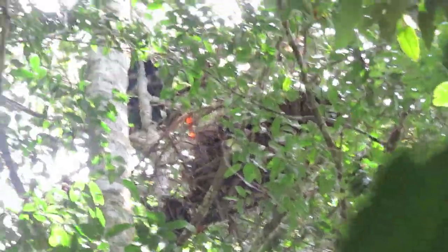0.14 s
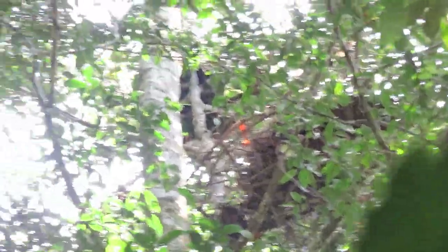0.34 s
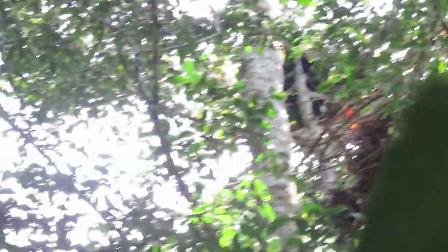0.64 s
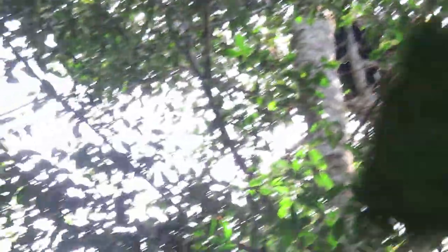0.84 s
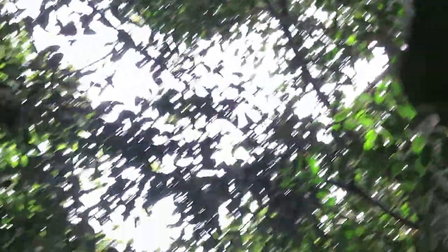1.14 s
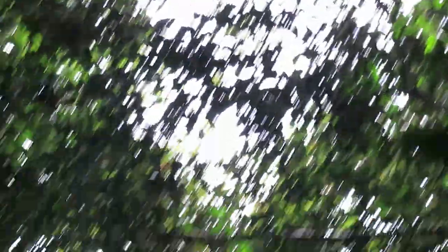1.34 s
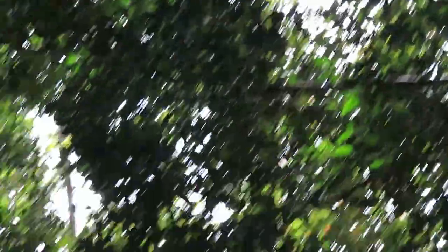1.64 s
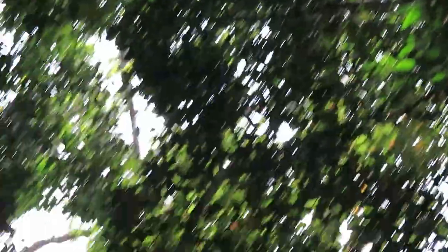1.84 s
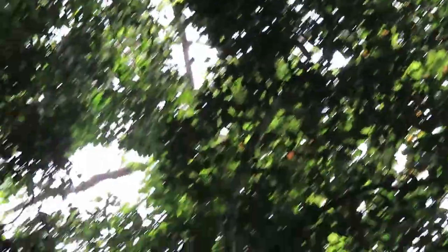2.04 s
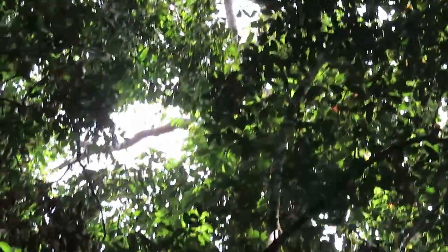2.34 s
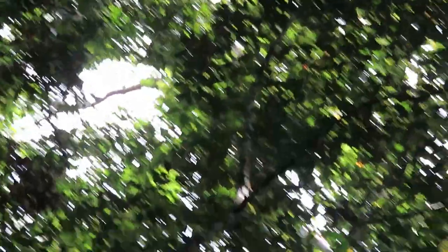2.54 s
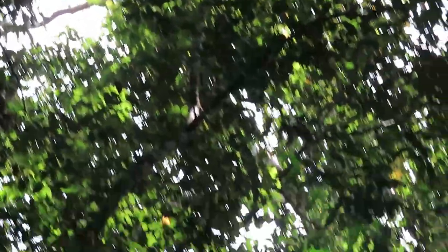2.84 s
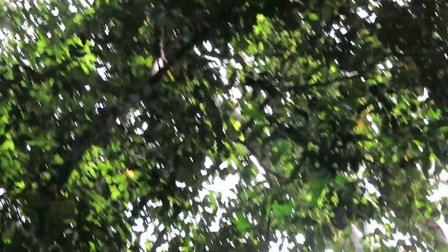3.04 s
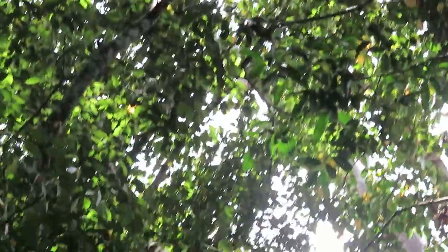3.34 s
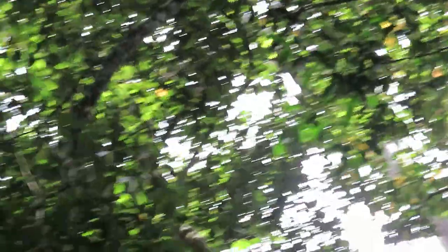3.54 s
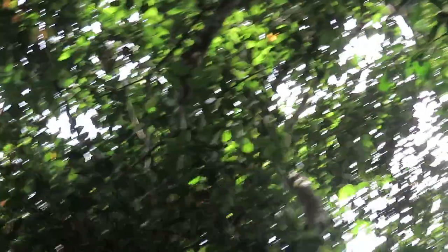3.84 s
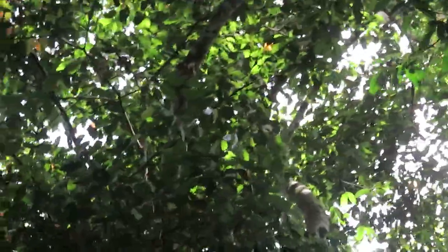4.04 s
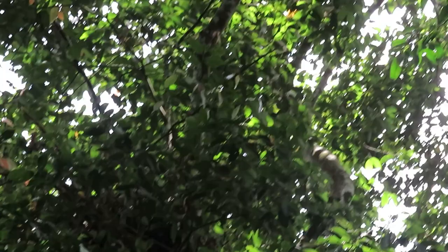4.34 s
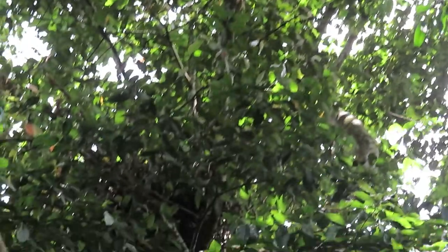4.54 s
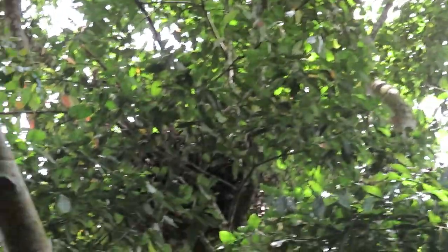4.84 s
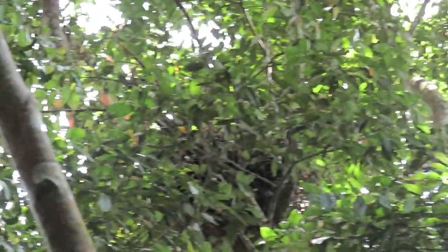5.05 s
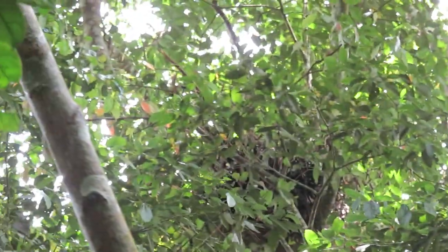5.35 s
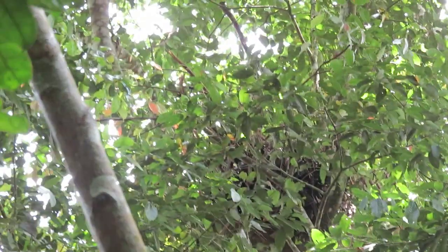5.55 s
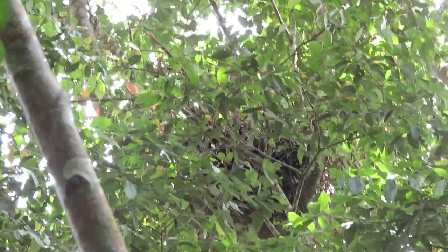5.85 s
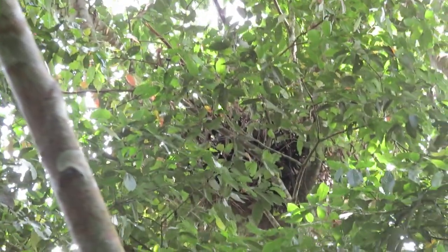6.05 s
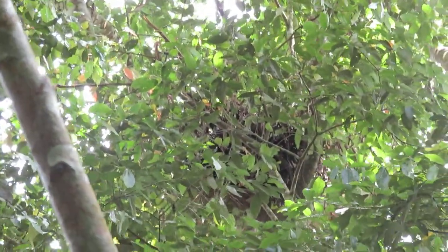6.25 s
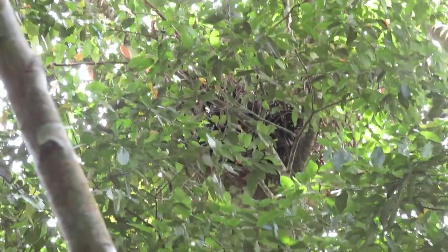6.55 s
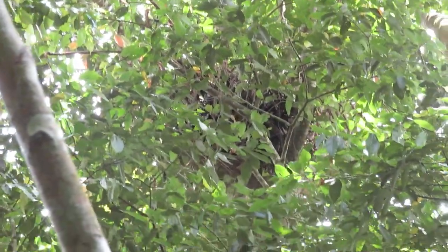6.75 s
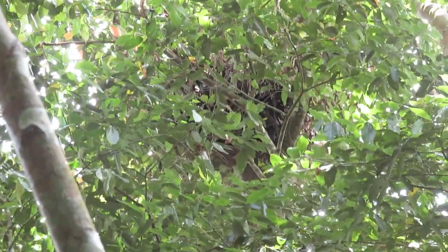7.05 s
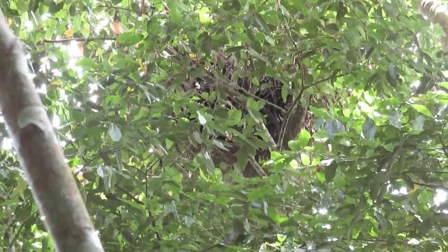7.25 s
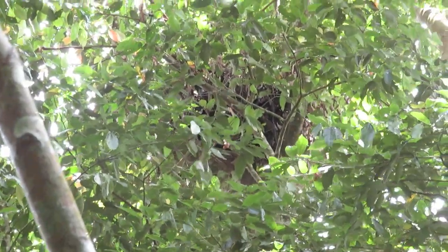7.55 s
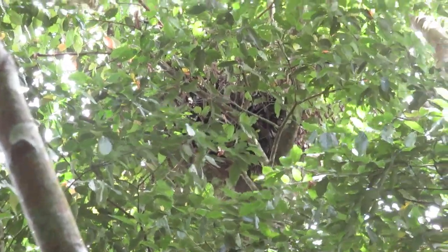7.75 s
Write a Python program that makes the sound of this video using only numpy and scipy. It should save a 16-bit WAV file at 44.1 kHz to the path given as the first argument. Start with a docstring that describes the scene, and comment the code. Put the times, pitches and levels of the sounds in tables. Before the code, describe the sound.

Dry, sharp cracks like twigs breaking come at irregular intervals, very close, each ringing briefly as if inside the camera's shell. Much quieter are the hand-held camera's own noises: stuttering focus rasps near the start and end, dull finger bumps, and a thin zoom whine midway that later gives way to a lower hum. Behind them lie soft forest foliage, steady insects and a far bird. Air briefly buffets the microphone at the end.

```python
"""A hand-held camera in a forest. Throughout: a wash of leaves, an insect chorus, a far bird now and then.
From 0.3 s the focus stepper hunts, rasping through the lens barrel. From 1.5 s dry, twig-like snaps
crack very close and ring briefly, as if in the camera's shell. Fingers bump the body, mostly at 2-3 s.
The zoom gears whine from 3.5 s, and the loudest snap falls at 3.8 s. From 6.2 s come more snaps, a lower
zoom hum and more hunting; at 7.7 s air buffets the microphone."""
import sys
import numpy as np
from scipy import signal
from scipy.fft import rfft, irfft
from scipy.io import wavfile

SR = 44100
rng = np.random.default_rng(int(sys.argv[2]) if len(sys.argv) > 2 else 0)


def dump_mix(stems):
    """Bounce the given channels to the path in sys.argv[1] as a 16-bit WAV at rate SR."""
    frames = np.atleast_2d(stems).T  # one column per channel
    limited = np.clip(frames, -1, 1)  # hard clip at full scale
    pcm = np.round(limited * 32767).astype(np.int16)
    wavfile.write(sys.argv[1], SR, pcm)


N = 347949
TIME_S = np.arange(N) / SR
BINS_HZ = np.fft.rfftfreq(N, 1 / SR)

# foliage spectrum: freq_hz, gain_db
LEAF_SPECTRUM = [(20, 10.5), (50, 3), (100, -2.5), (220, -2), (550, 1.5), (800, -1), (1150, -2),
                 (1600, -7.5), (2500, -13.5), (4000, -19), (6000, -21.5), (11000, -23), (16000, -21)]
# foliage left-right likeness: freq_hz, base_coherence
LEAF_COHERENCE = [(60, 0.17), (150, 0.18), (380, 0.11), (950, 0.3), (2380, 0.13), (5980, 0.2),
                  (15000, -0.07)]
# breeze strength: time_s, relative_db
BREEZE = [(0.0, -63.5), (0.92, -61.5), (2.64, -64.5), (6.48, -62.5), (6.72, -61), (7.12, -59.5),
          (7.34, -59), (7.58, -63), (7.89, -63)]
# far insects: freq_hz, gain_db
CHORUS_SPECTRUM = [(4500, -36), (6000, -8), (6550, 1.5), (7100, 2), (8000, 2), (9000, -4.5), (10500, -12),
                   (14000, -25)]
# near insects: pitch_hz, level_db
TRILLS = [(6487, -89), (6632, -84), (6965, -85), (7140, -89), (7666, -96)]
# bird glides: start_s, length_s, first_hz, last_hz, bow_hz, relative_db
WHISTLES = [(0, .04, 4770, 5700, 150, -68), (1.801, .175, 4230, 5670, -270, -70),
            (3.04, 0.17, 4280, 5650, -200, -69.5), (4.625, .15, 4350, 4300, 950, -66),
            (6.335, .19, 4050, 5620, -330, -69)]
# air on the microphone: start_s, end_s, relative_db
BUFFETS = [(7.685, 7.91, -45.5)]
# its spectrum: freq_hz, gain_db
BUFFET_SPECTRUM = [(15, -6.5), (38, -4.5), (70, -4.5), (110, -15), (180, -25), (400, -45), (1000, -82)]
# finger bumps: start_s, level_db, pitch_hz
BUMPS = [(.106, -43, 253), (2.061, -47, 231), (2.090, -45, 206), (2.121, -45, 300), (2.137, -47, 70),
         (2.685, -49, 483), (2.771, -50, 476), (2.965, -49.5, 520), (4.645, -52, 520), (7.384, -49, 550)]
# zoom runs, whining: start_s, end_s, relative_db
ZOOM_WHINES = [(3.47, 4.12, -70.5), (4.94, 5.46, -66.5), (5.53, 5.66, -61), (5.63, 5.85, -67),
               (5.81, 5.93, -60), (5.93, 6.24, -67)]
# zoom runs, humming: start_s, end_s, relative_db
ZOOM_HUMS = [(6.54, 6.63, -60.5), (6.66, 6.89, -55.5)]
# lens barrel response: freq_hz, gain_db
BARREL_SPECTRUM = [(300, -34.5), (470, -12), (575, 1.5), (660, -14.5), (810, 6), (950, 0), (1220, 6),
                   (1420, 0.5), (1630, -2), (1850, -6.5), (2100, -17), (3200, -23), (5500, -38)]
# single focus moves: start_s, nominal_length_s, level_db, steps_per_s
FOCUS_MOVES = [(0.319, 0.016, -53.5, 220), (.520, .032, -62, 220), (0.581, 0.03, -55.5, 210),
               (0.649, 0.041, -50, 200), (0.718, 0.038, -49.5, 272), (0.878, 0.0076, -46, 236),
               (0.914, 0.037, -53, 236), (1.113, 0.042, -55, 236), (1.314, .039, -53.5, 236),
               (1.651, 0.039, -49, 236), (5.366, .013, -57.5, 236), (5.45, 0.013, -57, 236),
               (6.225, 0.013, -51, 236), (6.465, .021, -55.5, 236), (6.786, 0.057, -54.5, 236),
               (7.424, 0.11, -49.5, 238)]
# focus hunting: start_s, end_s, level_db, nudge_s
FOCUS_HUNTS = [(.4495, 1.76, -53.5, 0.013), (6.553, 6.94, -54.5, .021), (7.0855, 7.33, -50.5, 0.012)]
# fracture spectrum: freq_hz, gain_db
CRACK_SPECTRUM = [(130, 1), (380, -2), (750, 2.5), (1400, 5), (3200, 4.5), (4500, -9.5), (8000, -16.5),
                  (15000, -22.5)]
# shell resonances: base_hz, gain_db, base_t60_s
SHELL_MODES = [(595, -27.5, 0.052), (853, -33, 0.032), (1052, -12.5, 0.039), (1278, -10.5, 0.034),
               (1475, -1.5, 0.023), (1564, -6.5, 0.038), (1846, -2, 0.015), (1990, -11.5, 0.013),
               (2410, -11.5, 0.015), (2925, -11, .014), (3460, -21.5, 0.01), (3900, -30, 0.01),
               (4400, -34.5, 0.013), (5800, -36, 0.011)]
# snaps: time_s, level_db, pitch_ratio, tilt_db_per_oct, left_lag_ms, second_delay_ms, second_relative_db
SNAPS = [(1.5047, -17.5, 1, -1.5, .13, 2.7, -20), (1.5303, -12, 1.01, 1.5, 0.14, 2.65, -12),
         (1.9785, -22.5, 0.94, -0.5, 0.24, 2.9, -28), (1.9992, -28.5, 0.98, -6, 0.15, 2.7, -20),
         (2.2213, -40.5, .86, -17, .08, 3, -7), (3.7620, -42, .96, -1, 0.055, 4.3, 1),
         (3.7908, -9, 1.002, 4.2, -.12, 2.75, 2), (5.2278, -33, 0.91, -1.5, 0.15, 3, -19),
         (6.2500, -31, 0.83, -10.5, .08, 3, -22), (6.2745, -14, 0.98, 8, 0.16, 3.3, 0),
         (6.7230, -33, .87, -9, .12, 3, -7), (6.9276, -34, .95, -1, 0.09, 3.5, -4),
         (7.157, -36.5, 0.91, 1, 0.1, 3, -5), (7.2273, -32, 0.9, -6, 0.037, 3.1, -3),
         (7.2450, -15.5, 0.97, 5.5, 0.2, 5.5, -8), (7.2934, -38.5, 0.93, 4, 0.085, 3.5, -5)]


def amp(db):
    """Decibels to gain."""
    return 10 ** (np.asarray(db) / 20)


def unit_rms(x):
    """Scale to rms 1."""
    return x / np.sqrt(np.mean(x ** 2) + 1e-20)


def curve_at(points, hz):
    """Interpolate on a log-frequency axis."""
    freq_hz, value = np.transpose(points)
    return np.interp(np.log(hz + 1), np.log(freq_hz + 1), value)


def add(mix, start_s, sound):
    """Mix a sound in at start_s."""
    part = mix[:, max(round(start_s * SR), 0):][:, :sound.shape[-1]]
    part += sound[..., :part.shape[1]]


def noise(gain, coherence=0):
    """Stereo noise, rms 1, shaped by a gain per bin."""
    left, other = rfft(rng.standard_normal((2, N)))
    right = coherence * left + np.sqrt(1 - coherence ** 2) * other
    return unit_rms(irfft(np.array([left, right]) * gain, N))


def resonance(hz, centre_hz, width_hz):
    """Gain of a steep-skirted peak."""
    return 1 / (1 + (2 * (hz - centre_hz) / width_hz) ** 2)


def impulse_response(spectrum, size=2048):
    """Minimum-phase response, energy 1."""
    log_gain = np.log(amp(curve_at(spectrum, abs(np.fft.fftfreq(size, 1 / SR)))))
    response = np.fft.ifft(np.exp(np.conj(signal.hilbert(log_gain)))).real[:size // 2]
    return response / np.linalg.norm(response)


def drift(rate_hz):
    """Smooth random wander, rms 1."""
    return unit_rms(irfft(rfft(rng.standard_normal(N)) * np.exp(-(BINS_HZ / rate_hz) ** 2), N))


def envelope(rows, fade_s, waver_db, waver_hz):
    """Per row: fade in, wavering hold, fade out."""
    held = sum(amp(db) * np.clip(np.minimum(TIME_S - start_s, end_s - TIME_S) / fade_s, 0, 1)
               for start_s, end_s, db in rows)
    return held * amp(waver_db * drift(waver_hz))


def leaves(split_hz=2500, trim_db=6, hiss_gain_db=-57.1, flutter_db=1.34, pan_db=0.5):
    """The low wash of foliage follows the breeze; the hiss on top stays steady."""
    wash = noise(amp(curve_at(LEAF_SPECTRUM, BINS_HZ)), 0.96 * curve_at(LEAF_COHERENCE, BINS_HZ))
    body = signal.sosfiltfilt(signal.butter(2, split_hz, fs=SR, output="sos"), wash)
    breeze_db = np.interp(TIME_S, *np.transpose(BREEZE))
    swell = amp(breeze_db + trim_db + flutter_db * drift(rate_hz=6.3))
    return body * swell * amp([[-pan_db], [pan_db]]) + (wash - body) * amp(hiss_gain_db)


def insects(chorus_db=-68, trill_width_hz=22):
    """Far insects blur into one band; a few near ones hold their own pitch."""
    chorus = amp(chorus_db) * noise(amp(curve_at(CHORUS_SPECTRUM, BINS_HZ)))
    return chorus + sum(amp(db) * noise(resonance(BINS_HZ, hz, trill_width_hz)) for hz, db in TRILLS)


def bird(direct_db=-9, echo_db=-1, echo_t60_s=0.55):
    """Thin slurred whistles, smeared by scattering among trunks."""
    song = np.zeros((1, N))
    wobble = 1 + 0.0093 * drift(rate_hz=130)
    for start_s, length_s, first_hz, last_hz, bow_hz, db in WHISTLES:
        progress = np.arange(0, length_s, 1 / SR) / length_s
        pitch_hz = first_hz + (last_hz - first_hz) * progress + bow_hz * np.sin(np.pi * progress)
        phase = 2 * np.pi * np.cumsum(pitch_hz * wobble[:len(progress)]) / SR
        add(song, start_s, amp(db) * np.sqrt(2) * np.sin(phase) * signal.windows.tukey(len(phase), 0.36))
    reflections = rng.standard_normal((2, SR)) * (rng.random((2, SR)) < 0.04)
    reflections *= amp(-60 * TIME_S[:SR] / echo_t60_s)
    echo = signal.fftconvolve(song, reflections / np.linalg.norm(reflections[0]))[:, :N]
    return amp(direct_db) * song + amp(echo_db) * echo


def air_buffet(trim_db=1):
    """Air rumbles at the microphone ports."""
    gust = envelope(BUFFETS, fade_s=0.032, waver_db=3, waver_hz=14)
    return amp(trim_db) * gust * noise(amp(curve_at(BUFFET_SPECTRUM, BINS_HZ)), coherence=0.27)


def finger_bumps(rise_s=0.0009, t60_s=0.046):
    """Soft fingertips land gradually on the body: dull thuds."""
    out = np.zeros((2, N))
    age_s, bins_hz = TIME_S[:4096], np.fft.rfftfreq(4096, 1 / SR)
    contour = (1 - np.exp(-(age_s / rise_s) ** 2)) * amp(-60 * age_s / t60_s)
    for start_s, db, pitch_hz in BUMPS:
        white = rng.standard_normal((3, len(age_s)))  # shared, left, right
        thud = irfft(rfft(white) * resonance(bins_hz, pitch_hz, width_hz=pitch_hz))
        add(out, start_s, amp(db) * contour * unit_rms(thud[0] + 0.5 * thud[1:]))
    return out


def zoom_motor(whine_trim_db=-1.5, hum_trim_db=-1):
    """The zoom gears stir two narrow resonances."""
    whine = noise(resonance(BINS_HZ, centre_hz=1170, width_hz=130), coherence=0.59)
    whine *= envelope(ZOOM_WHINES, fade_s=0.042, waver_db=1.5, waver_hz=9.3)
    hum = noise(resonance(BINS_HZ, centre_hz=570, width_hz=75), coherence=1)
    hum *= envelope(ZOOM_HUMS, fade_s=0.049, waver_db=2, waver_hz=11)
    return amp(whine_trim_db) * whine + amp(hum_trim_db) * hum


def focus_runs(hunt_hz=14.985, back_after_s=0.028, steps_per_s=236, scatter_db=0.9):
    """Single moves, plus clocked out-and-back nudges wherever no move interrupts."""
    runs = list(FOCUS_MOVES)
    for start_s, end_s, db, nudge_s in FOCUS_HUNTS:
        for cycle_s in np.arange(start_s, end_s, 1 / hunt_hz):
            for at_s in (cycle_s, cycle_s + back_after_s):
                nudge_db = db + scatter_db * rng.standard_normal()
                travel_s = nudge_s * np.exp(0.18 * rng.standard_normal())
                if not any(move_s - nudge_s < at_s < move_s + length_s
                           for move_s, length_s, _, _ in FOCUS_MOVES):
                    runs.append((at_s, travel_s, nudge_db, steps_per_s))
    return runs


def focus_motor(step_jitter=0.029, ramp_s=0.0067, left_lag_s=0.00011, right_db=1.5, max_samples=4096):
    """Stepper ticks and gear scrape ring the lens barrel."""
    drive = np.zeros((2, N))
    for start_s, length_s, db, steps_per_s in focus_runs():
        count = int(np.clip(length_s * SR, 64, max_samples))
        scrape = rng.standard_normal((3, max_samples))[:, :count]  # shared, left, right
        steps_s = (np.cumsum(1 + step_jitter * rng.standard_normal(24)) - 0.5) / steps_per_s
        ticks = np.bincount((steps_s * SR).astype(int), minlength=count)[:count]
        rasp = unit_rms(ticks) + 0.65 * scrape[0] + 0.4 * scrape[1:]
        fade = signal.windows.tukey(count, min(2 * ramp_s / length_s, 0.5))
        add(drive, start_s, amp(db) * unit_rms(rasp * fade))
    left, right = signal.oaconvolve(drive, impulse_response(BARREL_SPECTRUM)[None])[:, :N]
    return np.array([np.interp(TIME_S - left_lag_s, TIME_S, left), right * amp(right_db)])


def fractures(give_lead_s=0.0058, give_db=-13, give_db_per_oct=-2):
    """Three stages per snap: a dull give, the crack, a second crack as it tears through."""
    for at_s, db, pitch_ratio, db_per_oct, lag_ms, second_ms, second_db in SNAPS:
        yield at_s - give_lead_s, db + second_db + give_db, pitch_ratio, db_per_oct + give_db_per_oct, lag_ms
        yield at_s, db, pitch_ratio, db_per_oct, lag_ms
        yield at_s + second_ms / 1000, db + second_db, pitch_ratio, db_per_oct, lag_ms


def snaps(crack_db=-20.5, crack_t60_s=0.023, tear_s=0.002, rise_s=0.00083, scatter_db=2.5, right_db=1):
    """Each fracture tears, lets go and rings the shell, reaching the two ports at different times."""
    out = np.zeros((2, N))
    time_s = np.arange(-512, 3584) / SR  # 0 = release
    tear = (1 + np.tanh(time_s / tear_s)) / 2
    crack_filter = impulse_response(CRACK_SPECTRUM)[None]
    mode_hz, mode_db, t60_s = np.transpose(SHELL_MODES)[:, :, None, None]
    octaves = np.log2(mode_hz / mode_hz[mode_db.argmax()])
    for at_s, db, pitch_ratio, db_per_oct, lag_ms in fractures():
        delay_s = np.maximum([[lag_ms], [-lag_ms]], 0) / 1000
        age_s = np.maximum(time_s - delay_s, 0)
        ring_t60_s = t60_s * 0.67 * 2 ** (-db / 37.5)  # weaker fractures ring longer
        weight = amp(mode_db + db_per_oct * octaves + scatter_db * rng.standard_normal((len(mode_hz), 2, 1)))
        modes = weight * amp(-60 * age_s / ring_t60_s) * np.sin(2 * np.pi * mode_hz * pitch_ratio * age_s)
        ring = 0.67 * modes.sum(0) * (1 - np.exp(-age_s / rise_s))
        burst = rng.standard_normal(age_s.shape) * amp(-60 * age_s / crack_t60_s) * tear
        crack = amp(crack_db + db_per_oct / 2) * signal.fftconvolve(burst, crack_filter)[:, :len(time_s)]
        add(out, at_s + time_s[0], amp(db) * (ring + crack))
    return out * amp([[0], [right_db]])


def scene():
    """Forest, camera sounds, close snaps."""
    forest = leaves() + insects() + bird()
    camera = air_buffet() + finger_bumps() + zoom_motor() + focus_motor()
    return forest + camera + snaps()


def record(dry):
    """The recorder's band limit."""
    lowpass = signal.firwin(511, cutoff=15850, window=("kaiser", 9), fs=SR)
    return signal.oaconvolve(dry, lowpass[None], "same")


dry = scene()
out = record(dry)
dump_mix(out)
```